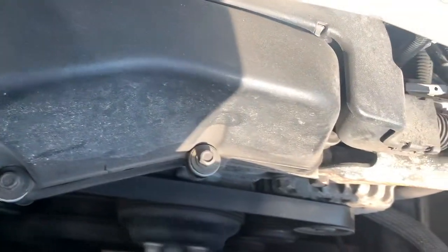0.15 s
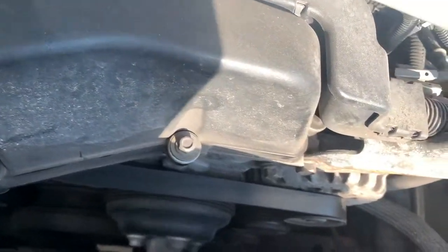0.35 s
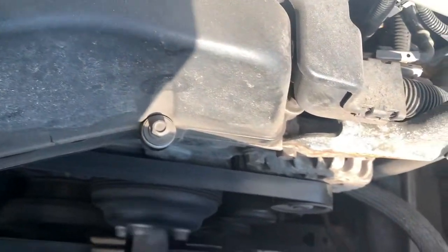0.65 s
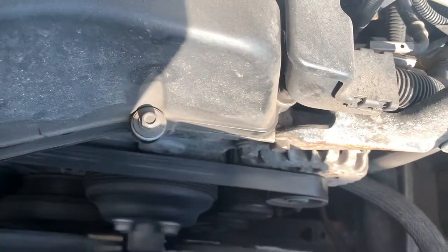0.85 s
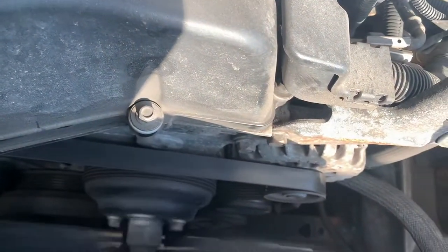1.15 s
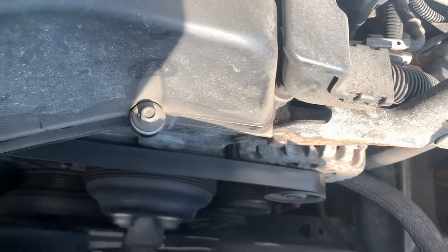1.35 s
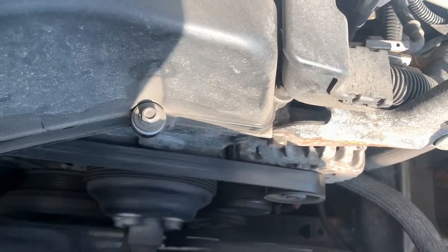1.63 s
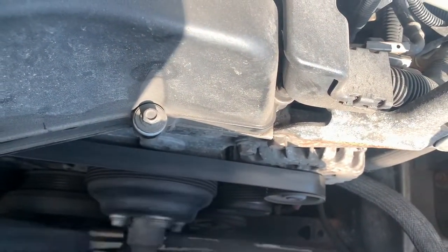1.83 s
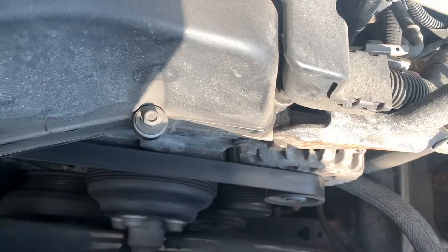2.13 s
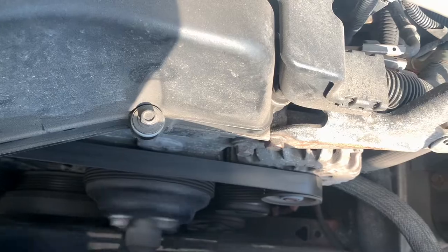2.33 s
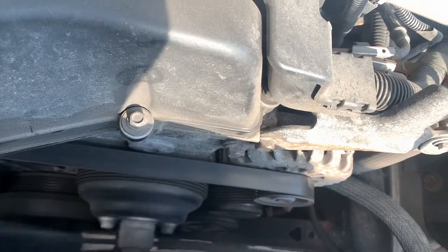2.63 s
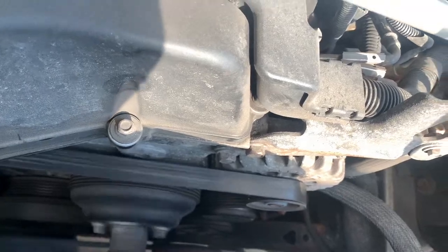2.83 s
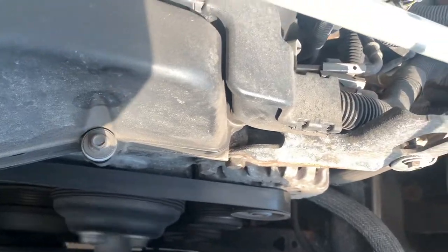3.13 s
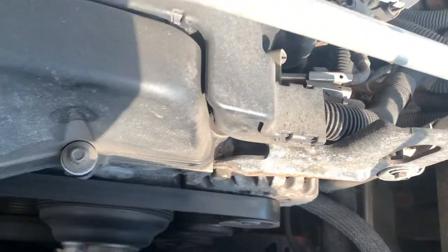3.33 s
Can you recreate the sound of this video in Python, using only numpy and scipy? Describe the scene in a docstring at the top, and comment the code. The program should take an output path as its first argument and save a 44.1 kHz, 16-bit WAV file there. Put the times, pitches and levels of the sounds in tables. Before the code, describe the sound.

A car engine idles close by with regular knocking, rumble, ticking and faint belt whine.

```python
"""A six-cylinder car engine idles, with one loud knock and its rebounds in each engine cycle.
The blows ring the cover over firing hum, rumble and a clatter that swells with the crank.
Valve gear ticks in a steady hiss; belt and pulleys add fuzzy whines.
Heard close over the open engine bay by two microphone ports."""
import sys
import numpy as np
from scipy import signal
from scipy.fft import rfft, irfft
from scipy.io import wavfile
from scipy.ndimage import uniform_filter1d

SR = 44100
rng = np.random.default_rng(int(sys.argv[2]) if len(sys.argv) > 2 else 0)


def put_to_file(sound):
    """Save the sound as 16-bit audio at rate SR, in the file named by the first command-line argument."""
    columns = np.atleast_2d(sound).T  # one column per channel
    safe = np.clip(columns, -1, 1)
    whole_steps = np.round(safe * 32767)
    wavfile.write(sys.argv[1], SR, whole_steps.astype(np.int16))


N = 153468

# The loud knock; it marks each engine cycle. Each row: start in seconds, level in dB.
KNOCKS = [(0.1893, -23), (0.3855, -25.5), (0.5797, -28), (0.7748, -19.5), (0.9689, -26), (1.1609, -21.5),
          (1.3525, -20.5), (1.5423, -19.5), (1.7368, -24), (1.927, -22.5), (2.121, -19.5), (2.3157, -22),
          (2.5101, -21), (2.7071, -24), (2.9025, -18.5), (3.0981, -21.5), (3.2935, -19.5)]


def gain_of(db):
    """Decibels to gain."""
    return 10 ** (np.asarray(db) / 20)


def unit_rms(x):
    """Scale to rms 1."""
    return x / np.sqrt(np.mean(x ** 2) + 1e-20)


def curve_at(points, hz):
    """Interpolate a table on a log-frequency axis."""
    points_hz, values = np.transpose(points)
    return np.interp(np.log(hz + 1), np.log(points_hz + 1), values)


def panned(db):
    """Channel gains for a left-over-right level."""
    return gain_of([[db / 2], [-db / 2]])


def drift(hz):
    """Random wander up to about hz, rms 1."""
    spectrum = rfft(rng.standard_normal(N))
    return unit_rms(irfft(spectrum / (1 + (np.fft.rfftfreq(N, 1 / SR) / hz) ** 4), N))


def stereo_noise(shape):
    """Noise with spectral gain shape(hz); stereo likeness and left-right phase vary by frequency."""
    # Each row: frequency in Hz, stereo likeness 0-1.
    stereo_likeness = [(50, .86), (170, .75), (280, .62), (600, .55), (800, .3), (1000, .45), (2200, .25),
                       (3100, .1), (4300, .3), (5500, .2), (7000, .65), (8600, .9), (9100, 1), (10400, 1),
                       (11000, .55), (11850, .55), (12000, 1), (14300, 1), (14600, .55)]
    # Each row: frequency in Hz, left-right phase in turns.
    # The treble hiss is fully opposed at 9.1-10.4 kHz and fully centred at 12-14.3 kHz.
    stereo_phase = [(600, 0), (3100, .5), (6350, 1), (7000, 1.06), (8600, 1.43), (9100, 1.5), (10400, 1.5),
                    (12000, 2), (14300, 2), (15600, 2.37)]
    hz = np.fft.rfftfreq(N, 1 / SR)
    left, unrelated = rfft(rng.standard_normal((2, N)), axis=1)
    same = np.clip(curve_at(stereo_likeness, hz), 0, 1)
    rotation = np.exp(-2j * np.pi * curve_at(stereo_phase, hz))
    right = same * left * rotation + np.sqrt(1 - same ** 2) * unrelated
    return unit_rms(irfft(np.array([left, right]) * shape(hz), N, axis=1))


def coloured_noise(spectrum):
    """Stereo noise shaped by rows of Hz and dB, rms 1."""
    return stereo_noise(lambda hz: gain_of(curve_at(spectrum, hz)))


def patchy(x, db, frames, bins):
    """Random louder and softer patches in time and pitch, rms 1."""
    spectra = signal.stft(x, nperseg=256)[2]
    field = uniform_filter1d(rng.standard_normal(spectra.shape[1:]), bins, 0)
    field = unit_rms(uniform_filter1d(field, frames, 1))
    return unit_rms(signal.istft(spectra * gain_of(db * field), nperseg=256)[1][:, :N])


def cycle_starts_s():
    """Knock times, continued two cycles beyond both ends."""
    s = np.array(KNOCKS)[:, 0]
    return np.r_[s[0] - (s[1] - s[0]) * np.array([2, 1]), s, s[-1] + (s[-1] - s[-2]) * np.array([1, 2])]


def click_trains(places, spread_db, jitter_s):
    """One row per place in the cycle: a click each cycle, uneven in size and time."""
    starts_s = cycle_starts_s()
    cycles = np.arange(len(starts_s))
    out = np.zeros((len(places), N))
    for row, place in zip(out, places):
        timing, size = rng.standard_normal((len(cycles), 2)).T
        times_s = np.interp(cycles + place, cycles, starts_s) + jitter_s * timing
        at = np.round(times_s * SR).astype(int)
        inside = (at >= 0) & (at < N)
        row[at[inside]] = gain_of(spread_db * size[inside])
    return out


def valve_gear(level_db):
    """Steady hiss with a short, brighter double burst for each valve tick."""
    # One tick per cylinder. Each row: place in cycles, level in dB.
    tick_pattern = [(-.388, 10), (-.2, -4), (-.043, 4.5), (.122, 5.5), (.287, 6.5), (.458, 4)]
    # Tick and hiss spectra. Each row: frequency in Hz, relative density in dB.
    tick_spectrum = [(3500, -25), (6000, -9), (8000, -5), (10500, -5), (12500, 0), (16000, 0)]
    hiss_spectrum = [(3500, -25), (4500, -13), (5600, -4), (7000, -2), (8600, 0), (9500, 0), (10500, -2),
                     (12000, -3), (13000, 0), (16000, 0)]
    rise_s, fall_s, echo_s, echo_gain = .0004, .003, .0035, .7
    t = np.arange(1500) / SR
    burst = (1 - np.exp(-t / rise_s)) * np.exp(-t / fall_s)
    burst += echo_gain * np.interp(t - echo_s, t, burst, left=0)
    places, ticks_db = np.transpose(tick_pattern)
    clicks = gain_of(ticks_db) @ click_trains(places, spread_db=1.1, jitter_s=.0008)
    envelope = signal.oaconvolve(clicks, burst / burst.max())[:N]
    ticks = envelope * patchy(coloured_noise(tick_spectrum), db=1.8, frames=6, bins=10)
    hiss = coloured_noise(hiss_spectrum)
    return gain_of(level_db + .5 * drift(hz=10)) * (hiss + gain_of(2.5) * ticks)


def pulley_whine(firing_rad, level_db):
    """A pulley's tone, jittering in pitch and level, throbbing with the firing."""
    pitch_hz = 4893 + 30 * drift(hz=110)
    tone = np.sqrt(2) * np.cos(2 * np.pi * np.cumsum(pitch_hz) / SR)
    flicker_db = 5 * np.tanh(drift(hz=60)) - 2.5
    throb_db = 3 * np.cos(firing_rad - 2.6)
    return gain_of(level_db + throb_db + flicker_db) * panned(8.8) * tone


def belt_hiss(firing_rad):
    """The belt's band of hiss, throbbing with the firing."""
    centre_hz, width_hz, level_db = 6313, 295, -46
    hz = np.fft.rfftfreq(N, 1 / SR)
    white = rfft(rng.standard_normal(N) + .5 * rng.standard_normal((2, N)), axis=1)
    band = unit_rms(irfft(white / (1 + ((hz - centre_hz) / width_hz * 2) ** 2), N, axis=1))
    throb_db = 3.5 * (.54 * np.cos(firing_rad + .83) + .5 * np.cos(2 * firing_rad + 2))
    return gain_of(level_db + throb_db) * panned(2.9) * band


def firing(cycle, rumble_db):
    """Wavering hum locked to the crank, over rumble."""
    # Hum partials, in multiples of the cycle rate.
    orders = [12, 18, 24]
    # Hum levels. Each row: time in seconds, then each order's level in dB.
    hum_levels = [(0.0, -43, -33, -58), (0.38, -45, -50, -34), (0.52, -38, -29.5, -47),
                  (0.6, -30, -39, -42.5), (1.07, -34.5, -34, -34), (1.64, -32.5, -36, -39.5),
                  (1.74, -34, -50, -42.5), (2.51, -36.5, -35, -39.5), (2.64, -35, -41, -40.5),
                  (2.76, -37, -38, -34.5), (3.05, -33, -34, -38), (3.23, -31, -31, -31.5),
                  (3.28, -38, -48, -36.5), (3.48, -35.5, -36, -35)]
    # Rumble spectrum. Each row: frequency in Hz, relative density in dB.
    rumble_spectrum = [(15, -40), (25, -28), (37, -13.5), (60, -9.5), (78, 1), (93, -9), (105, -5),
                       (123, -11.5), (140, -9), (180, -15), (260, -17), (400, -38.5)]
    waver_db, waver_hz, waver_turns, right_turns = 1, 8, .05, .05
    t = np.arange(N) / SR
    times_s, *orders_db = np.transpose(hum_levels)
    hum = np.zeros((2, N))
    for order, db in zip(orders, orders_db):
        level_db = np.interp(t, times_s, db) + waver_db * drift(waver_hz)
        turns = order * cycle + [[0], [right_turns]] + rng.random() + waver_turns * drift(waver_hz)
        hum += gain_of(level_db) * np.sqrt(2) * np.cos(2 * np.pi * turns)
    return hum + gain_of(rumble_db) * coloured_noise(rumble_spectrum)


def clatter(cycle, low_db, middle_db, upper_db):
    """Dense mechanical noise and the resonances it keeps ringing, lumpy and swelling once a cycle."""
    # Clatter spectrum. Each row: frequency in Hz, relative density in dB.
    spectrum = [(120, 0), (200, -7.5), (330, -2.5), (560, -7), (750, -9), (1080, -4.5), (1350, -6),
                (1600, -7.5), (2100, -10), (2600, -13), (3100, -12), (3700, -17.5), (4300, -15),
                (5300, -18), (7000, -22)]
    # Bay resonances. Each row: centre in Hz, width in Hz, level offset in dB, left over right in dB,
    # swell in dB, trend in dB per second as the microphone moves.
    resonances = [(180, 50, -6, 0.5, 0, 1), (229, 49, -12, -3, 0, 1.5), (283, 24.6, -1.5, 0.5, -1.5, 0.3),
                  (380.7, 41, -9, 0.5, -0.5, -0.2), (471.6, 54, -6, 1.5, 1.4, 0.5),
                  (513, 18, -9.5, -1, 2, -0.2), (579, 29.5, -9, 6.5, 1.1, -0.7),
                  (634, 37, -15.5, -12.5, 3.5, -1), (742, 120, -11, 4.5, 1.5, -2),
                  (898, 55, -8.5, 8.5, -0.7, -0.3), (976.6, 46, -6, -0.5, 4.5, -0.2),
                  (1060, 58, -10, -2.1, 1.3, 0.4), (1448, 32, -17.5, -5, -3.5, 1.5),
                  (2074, 57, -25, 7, -2, -2), (2683, 120, -14, -1, -1, 0.3), (2970, 58, -18, 1.5, -4, -0.5),
                  (3270, 310, -18.5, 6.5, -3.5, -0.3)]
    bed_db, bed_swell_db, lump_db, steadying, steady_s = -32.5, 1, 1.5, .4, .07
    swell = np.cos(2 * np.pi * (cycle - .02))  # tops near the knock
    bed = patchy(coloured_noise(spectrum), db=2.2, frames=4, bins=3)
    out = gain_of(bed_db + bed_swell_db * swell) * panned(.13) * bed
    lumps_db = lump_db * np.array([drift(hz=30), drift(hz=30)])
    from_middle_s = (np.arange(N) - N / 2) / SR
    for k, (centre_hz, width_hz, db, pan_db, swell_db, trend_db_per_s) in enumerate(resonances):
        ring = stereo_noise(lambda hz: 1 / (1 + ((hz - centre_hz) / width_hz * 2) ** 2))
        power = uniform_filter1d((ring ** 2).mean(0), round(steady_s * SR))
        ring = unit_rms(ring / power ** (steadying / 2))  # partly holds its level
        band_db = low_db if centre_hz < 330 else middle_db if centre_hz < 800 else upper_db
        level_db = band_db + db + trend_db_per_s * from_middle_s + swell_db * swell + lumps_db[k % 2]
        out += gain_of(level_db) * panned(pan_db) * ring
    return out


def cover_knocks():
    """Each knock snaps; knocks, taps, clacks, rebounds and loose rattle ring the cover's modes."""
    # Duller taps, one firing after each knock. Each row: start in seconds, level in dB.
    taps = [(0.0256, -21), (0.2205, -23), (0.4192, -31), (0.613, -23), (0.8078, -24), (1.0014, -18.5),
            (1.1942, -21), (1.386, -24.5), (1.5743, -24), (1.7676, -17.5), (1.9588, -20.5), (2.155, -21.5),
            (2.3476, -23), (2.5433, -25), (2.7387, -24), (2.935, -28), (3.132, -22), (3.328, -21)]
    # Duller clacks, often a quarter cycle before a knock. Each row: start in seconds, level in dB.
    clacks = [(0.001, -16.5), (0.067, -27), (0.099, -27.5), (0.139, -15.5), (0.182, -20.5), (0.233, -26),
              (0.336, -22), (0.53, -22), (0.725, -22.5), (0.92, -25), (0.954, -26), (1.112, -25),
              (1.144, -23), (1.879, -23), (2.06, -26), (2.266, -26), (2.46, -24), (2.654, -31),
              (3.238, -32), (3.439, -24)]
    # Smaller blows around the knock. Each row: place in cycles, level in dB, upper modes' share 0-1.
    rebounds = [(-.15, -20, .2), (-.085, -8, .8), (-.03, -3.5, .7), (0.024, -3.5, 0.9), (.05, -6, 0.4),
                (0.077, -10, 0.5), (.1, -12.5, .3), (.225, -9, 0), (.34, -17.5, 0.7), (.63, -13, .8)]
    # Cover modes. Each row: pitch in Hz, level in dB, t60 in seconds, left over right in dB,
    # tap's share, clack's share.
    modes = [(477, -8.5, 0.075, 6, 0.7, 0.58), (971, -7, 0.037, 2, 0.68, 2.35),
             (1205, -3.5, 0.043, 3, 1.08, 0.16), (1254, -10.5, 0.058, -9, 1.54, .2),
             (1740, 0, 0.024, 1.5, .05, .1), (1833, -11, 0.018, 9, .05, .1)]
    rattle_per_s, rattle_db, rattle_spread_db = 70, -42, 3
    snap_db, snap_s = 1, .00025
    rise_s, right_turns, blow_spread_db = .0012, .23, 1.8
    knock, tap, clack = np.zeros((3, N))
    for row, table in ((knock, KNOCKS), (tap, taps), (clack, clacks)):
        for start_s, db in table:
            row[round(start_s * SR)] = gain_of(db)
    places, rebounds_db, upper_share = np.transpose(rebounds)
    mean_knock = gain_of(np.mean([db for _, db in KNOCKS]))
    rebound_trains = mean_knock * click_trains(places, spread_db=2.4, jitter_s=.0015)
    rattle_hits = rng.random(N) < rattle_per_s / SR
    rattle = rattle_hits * gain_of(rattle_db + rattle_spread_db * np.minimum(rng.exponential(1, N), 4))
    snap = -gain_of(snap_db) * signal.windows.gaussian(181, snap_s * SR)
    out = np.ones((2, 1)) * signal.oaconvolve(knock, snap - snap.mean())[:N]
    t = np.arange(3000) / SR
    for hz, db, t60_s, pan_db, tap_share, clack_share in modes:
        rebound_gains = gain_of(rebounds_db) * (np.clip(upper_share, 0, 1) if hz > 1500 else 1)
        small_blows = (rebound_gains @ rebound_trains + rattle) * rng.choice([-1, 1], N)
        blows = knock + tap_share * tap + clack_share * clack + small_blows
        blows = blows * gain_of(blow_spread_db * rng.standard_normal((1, N)))
        envelope = gain_of(db - 60 * t / t60_s) * np.minimum(t / rise_s, 1)
        ring = envelope * np.sin(2 * np.pi * (hz * t + [[0], [right_turns]]))
        out += panned(pan_db) * signal.oaconvolve(blows, ring, axes=1)[:, :N]
    return out


def scene():
    """All parts of the engine follow the crank."""
    # Slow levels. Each row: time in seconds, then dB of rumble, low, middle and upper resonances,
    # pulley whine, valve gear.
    levels = [(0, -32.5, -43, -36, -34, -72, -43), (.2, -35, -43, -33.5, -35.5, -59, -40.5),
              (.5, -31.5, -45, -34.5, -36.5, -50, -40.5), (1, -32, -42.5, -34.5, -36, -49, -42.5),
              (1.5, -32, -40, -33.5, -36, -49, -40.5), (2, -33, -39.5, -34, -35.5, -49, -38.5),
              (2.5, -31.5, -37, -34, -37.5, -50, -41.5), (2.75, -32, -40, -34.5, -36, -52, -39.5),
              (3.48, -32, -43, -33.5, -37, -56, -40.5)]
    t = np.arange(N) / SR
    times_s, *columns_db = np.transpose(levels)
    slow_db = [np.interp(t, times_s, db) for db in columns_db]
    rumble_db, low_db, middle_db, upper_db, whine_db, valve_db = slow_db
    starts_s = cycle_starts_s()
    cycle = np.interp(t, starts_s, np.arange(len(starts_s)))
    firing_rad = 2 * np.pi * 6 * cycle  # six firings a cycle
    return (firing(cycle, rumble_db) + clatter(cycle, low_db, middle_db, upper_db) + cover_knocks()
            + valve_gear(valve_db) + pulley_whine(firing_rad, whine_db) + belt_hiss(firing_rad))


def record(dry):
    """Steep low-pass band limit."""
    edge_hz = 15740
    lowpass = signal.firwin(1023, edge_hz, window=("kaiser", 10), fs=SR)
    return signal.oaconvolve(dry, lowpass[None], "same")


dry = scene()
out = record(dry)
put_to_file(out)
```